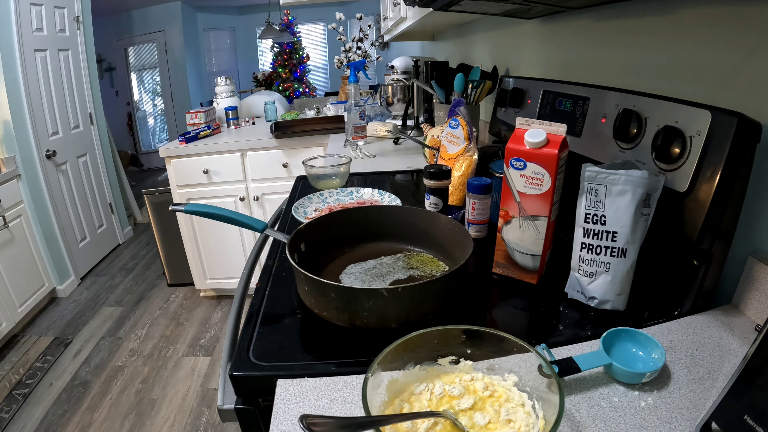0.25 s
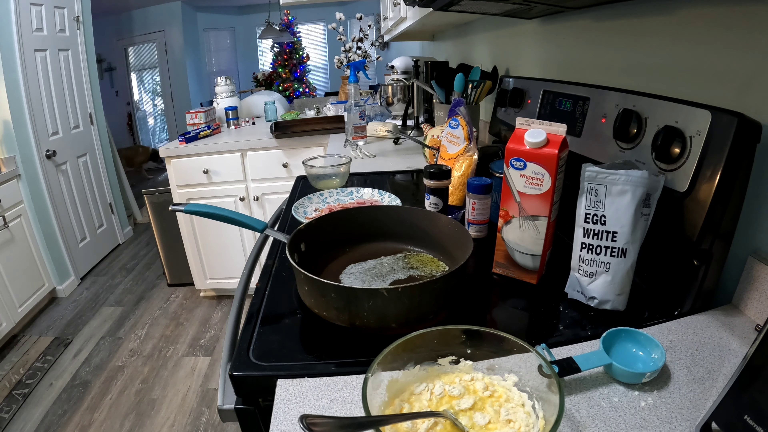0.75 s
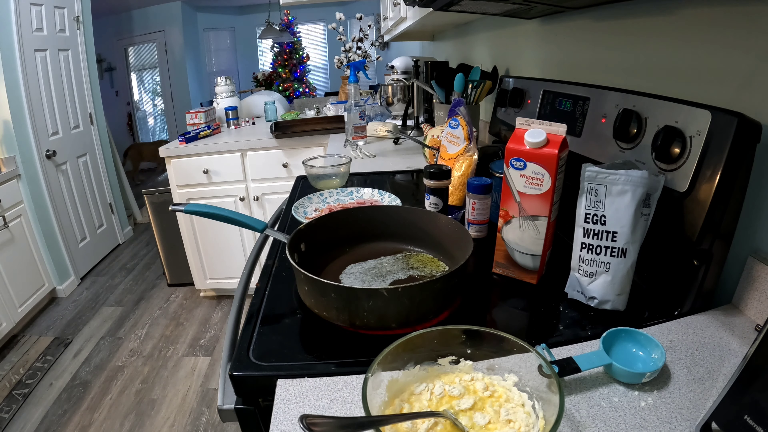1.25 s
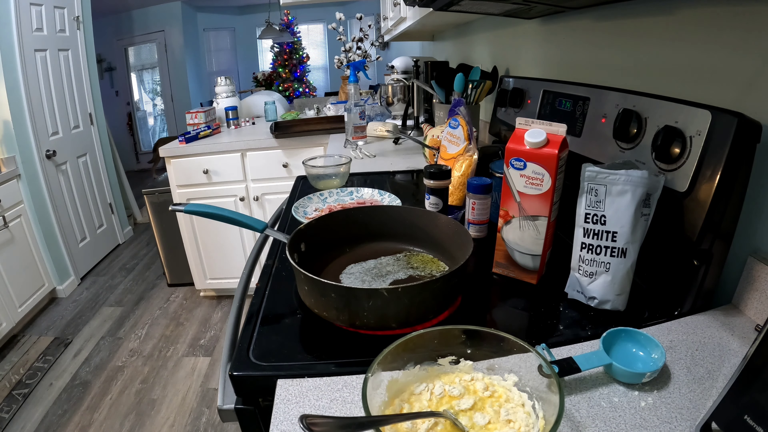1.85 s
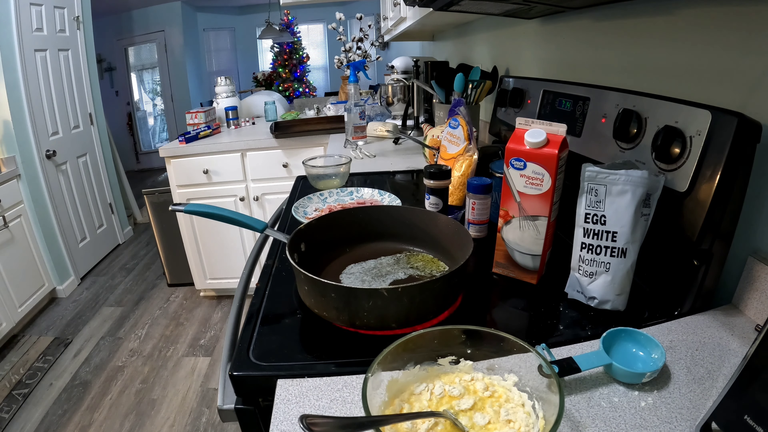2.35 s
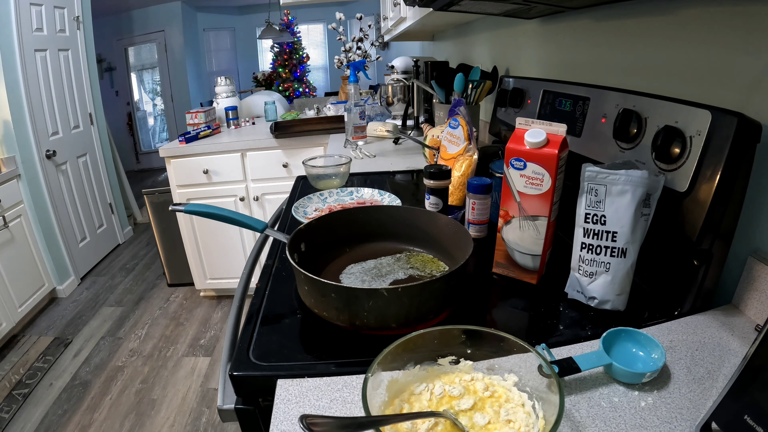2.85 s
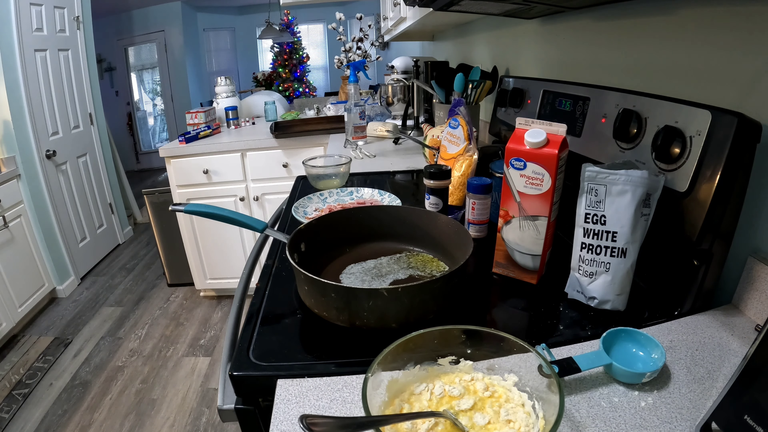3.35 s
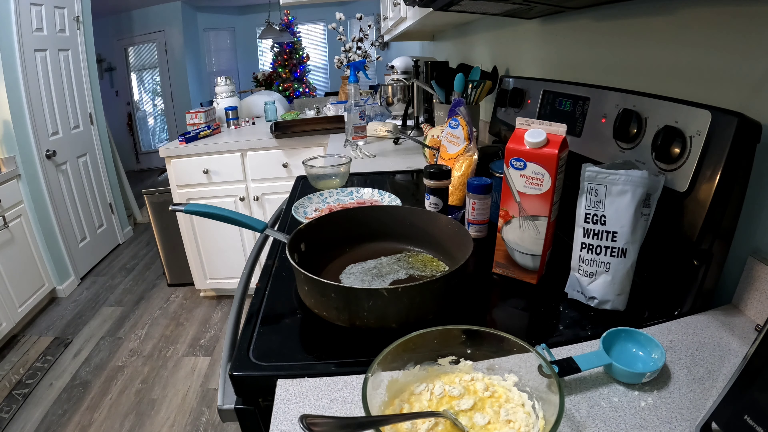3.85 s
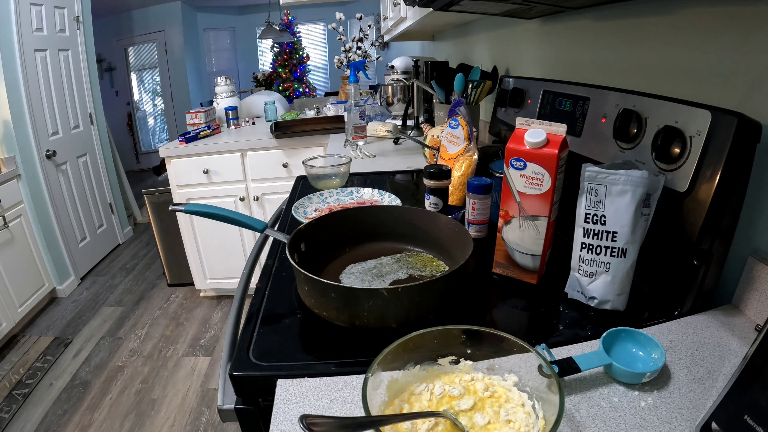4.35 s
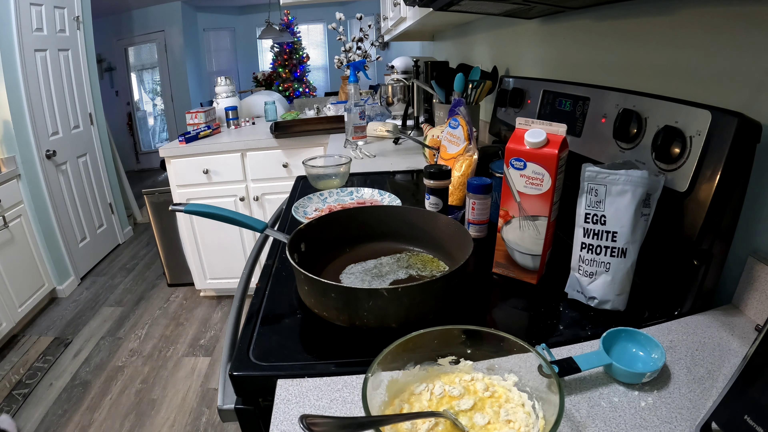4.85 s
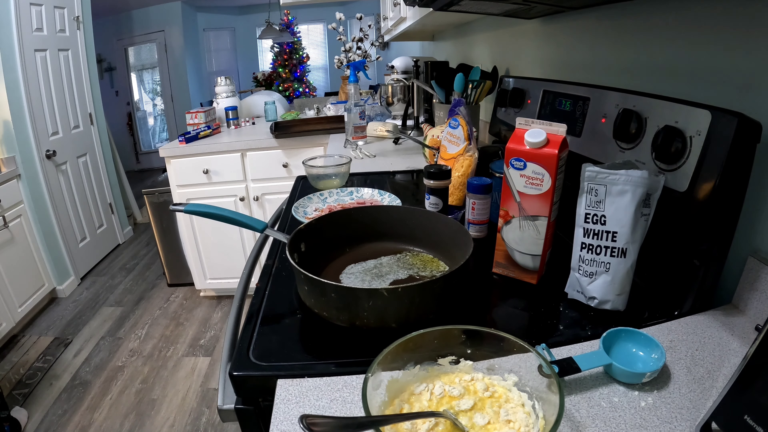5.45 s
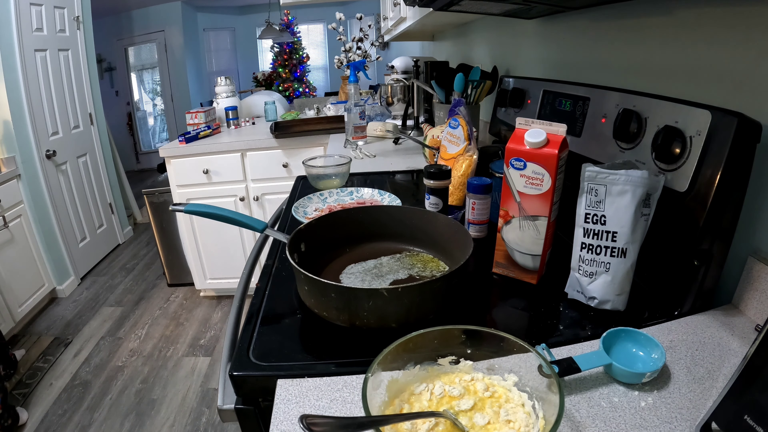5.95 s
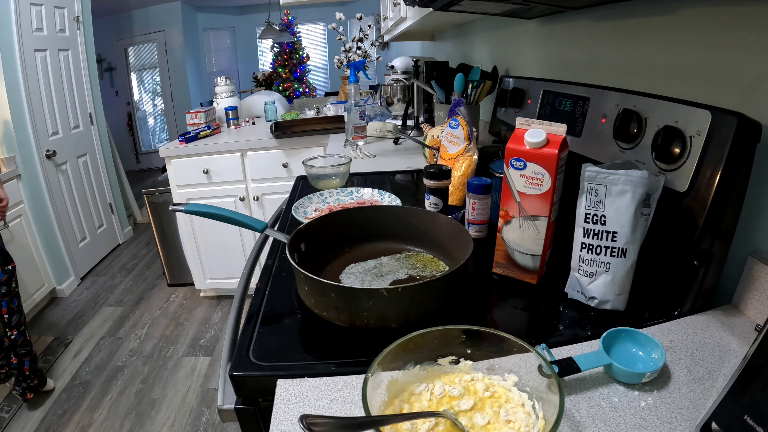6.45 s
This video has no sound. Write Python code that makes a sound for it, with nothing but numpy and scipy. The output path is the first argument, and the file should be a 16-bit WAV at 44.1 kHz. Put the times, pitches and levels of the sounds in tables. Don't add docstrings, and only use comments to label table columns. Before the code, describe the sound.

In a quiet kitchen, fat pops sharply and irregularly in a shallow pan close to a small stereo microphone. Off to one side a drawer rolls in fits, scraping and thumping its cabinet from about one and a half seconds. Midway it is shoved hard, the cutlery slams and clatters, then lesser knocks fade away, leaving pops, thin sizzle and a faint fridge hum.

```python
import sys
import numpy as np
from scipy import signal
from scipy.fft import rfft, irfft, next_fast_len
from scipy.io import wavfile
from scipy.ndimage import uniform_filter1d

SR = 44100
rng = np.random.default_rng(int(sys.argv[2]) if len(sys.argv) > 2 else 0)


def generate_wav(signal):
    frames = np.transpose(np.atleast_2d(signal))
    scaled = np.clip(frames, -1, 1) * 32767
    pcm = np.round(scaled).astype(np.int16)
    wavfile.write(sys.argv[1], SR, pcm)


def invert_db(x):
    u = np.asarray(x, float) / 20
    return 10 ** u


N = 295955
T = np.arange(N) / SR


def unit(x):
    return x / np.sqrt(np.mean(x ** 2))


def ring(x, hz, t60):
    pole = np.exp(2j * np.pi * hz / SR - np.log(1000) / (t60 * SR))
    return signal.lfilter([1], [1, -pole], x).imag


def peaks(x, table):
    total = 0
    for k, (hz, width, db) in enumerate(table):
        sign = (-1) ** k
        total = total + sign * invert_db(db) * signal.lfilter(*signal.iirpeak(hz, hz / width, SR), x)
    return total


def colour(x, table):
    hz, db = np.transpose(table)
    size = 8192
    grid_hz = np.arange(size // 2 + 1) * SR / size
    log_gain = np.interp(np.log(grid_hz + 1), np.log(hz), db) * np.log(10) / 20
    fold = irfft(log_gain) * np.r_[1, np.full(size // 2 - 1, 2), 1, np.zeros(size // 2 - 1)]
    return signal.fftconvolve(x, irfft(np.exp(rfft(fold))))[:N]


def jolts(rate, spread_db):
    size_db = spread_db * np.minimum(rng.exponential(size=N), 3.5)
    happens = rng.random(N) < rate / SR
    return unit(happens * np.clip(rng.standard_normal(N), -2.2, 2.2) * invert_db(size_db))


def walk(rate):
    k = int(SR / rate)
    steps = np.repeat(rng.standard_normal(N // k + 1), k)
    wander = uniform_filter1d(uniform_filter1d(steps, k), k)[:N]
    return np.clip(1.4 * wander, -1.8, 1.8)


def gain(table):
    s, db = np.transpose(table)
    return invert_db(np.interp(T, s, db, left=-140, right=-140))


def surge(s, db, hold, t60, rise):
    power, i = np.zeros(N), int(s * SR)
    t = T[:min(N - i, int((hold + t60) * SR))]
    fade = invert_db(db - 60 * np.maximum(t - hold, 0) / t60)
    power[i:i + len(t)] = (fade * (1 - np.exp(-t / rise))) ** 2
    return power


def place(x, pan_db):
    return np.array([x * invert_db(pan_db / 2), x * invert_db(-pan_db / 2)])


def pops():
    # pitch in Hz, width in Hz, level in dB.
    pan_floor = [(640, 3000, -12), (1240, 550, -2.5), (2130, 147, 1), (2800, 1240, -4.5)]
    # start in seconds, peak level in dB, bubble pitch in Hz,
    # low part in dB and bright part in dB, both relative to the bubble.
    bursts = [(0.165, -13.5, 6070, -16, 7), (0.2277, -21.5, 5800, -20, -13), (0.9557, -18, 6100, -29, -18),
              (1.1079, -16.5, 5530, -36, -17), (1.1499, -25, 6700, -32, -4), (1.661, -11, 5500, -2.5, 11),
              (1.727, -21.5, 5260, -1, -12), (1.9702, -17, 5760, -11, -13), (2.0428, -25, 5740, -21, -2),
              (2.4815, -27.5, 5160, 0, 11), (2.515, -22, 5550, -4.5, 11.5), (3.3895, -26, 3450, 5.5, -9),
              (3.5286, -25, 5760, -3.5, 0), (4.1041, -18.5, 6030, 4, 1), (4.1594, -23.5, 5800, -17, 5),
              (4.2819, -26.5, 4100, -0.5, -8), (4.3735, -22.5, 6050, -7, -14),
              (4.7171, -14, 5600, -10, -11), (4.8681, -18, 6060, -18, -4), (4.9116, -19, 5160, -17, -15),
              (5.1886, -20.5, 4570, -4, 3), (5.4954, -21, 6140, -30, 3), (5.7665, -23, 3540, -5, 2),
              (5.8119, -17.5, 6400, -14, 5), (6.0224, -20.5, 4330, -1.5, 8), (6.1304, -24.5, 6600, -26, 0),
              (6.492, -18, 4600, -20, -10), (6.526, -23.5, 5300, -13, -6), (6.6448, -20, 5070, -17, -13),
              (6.6696, -20.5, 5400, -2, -14)]
    # start in seconds, peak level in dB.
    large = [(0.2567, -34.5), (1.0193, -32.5), (1.7, -25), (2.416, -34), (3.188, -31.5), (3.2427, -51),
             (3.2549, -35), (4.1403, -27), (4.539, -24), (4.7392, -29), (5.2663, -27), (5.513, -36.5),
             (5.6316, -40), (6.2213, -37), (6.59, -38)]
    middle = [(0.1602, -34), (0.2881, -28.5), (0.873, -34), (0.9032, -33), (1.177, -31), (1.31, -35),
              (1.395, -27.5), (2.301, -29), (2.594, -28), (2.607, -26.5), (2.6534, -28), (2.724, -26),
              (2.7524, -46), (2.8424, -29.5), (2.942, -30), (3.0559, -29.5), (3.294, -32.5),
              (4.1946, -26.5), (4.2397, -31), (4.598, -29.5), (4.888, -28), (5.0727, -27.5), (5.118, -30.5),
              (5.169, -32), (5.353, -27.5), (5.729, -32.5), (5.792, -23.5), (5.9294, -38), (6.051, -30),
              (6.4172, -29.5), (6.5384, -29)]
    small = [(0.3103, -37), (0.494, -30), (0.7946, -32), (0.9301, -29.5), (1.2475, -38), (1.4676, -26.5),
             (1.91, -35), (2.785, -39), (2.811, -41), (2.894, -35), (4.355, -34), (5.666, -31),
             (5.688, -28.5), (5.778, -33), (5.9613, -39), (6.088, -35), (6.1994, -38), (6.319, -33),
             (6.393, -33), (6.407, -30), (6.459, -32)]
    tiny = [(0.019, -32), (0.03, -34), (0.238, -35), (0.567, -37), (0.705, -42), (0.2887, -30), (1.09, -35),
            (1.283, -34), (1.364, -31), (1.8552, -30), (2.5152, -29), (3.5289, -20.5), (3.6301, -23),
            (4.0931, -26), (4.701, -39.5), (5.1736, -25), (5.3512, -24.5), (5.89, -32.5), (5.9299, -22),
            (5.985, -42), (6.088, -33), (6.1305, -20.5), (6.1993, -29)]
    # bubble pitch in Hz, low part in dB relative to the bubble.
    sizes = [
        (3950, -1),
        (5650, -16),
        (6650, -8.5),
        (11000, -37),
    ]
    # start in seconds, peak level in
    # dB, pitch in Hz.
    ticks = [(0.4362, -50, 5440), (0.443, -46, 5560), (0.6911, -49, 5430), (0.7258, -53, 5380),
             (0.7496, -47, 5340), (0.8418, -41, 6030), (0.9085, -33, 5700), (0.934, -36, 7670),
             (1.09, -42, 5380), (1.3563, -34, 6890), (1.3624, -25.5, 7000), (1.7327, -26, 4200),
             (2.4826, -25, 5300), (2.7523, -36, 5200), (2.8151, -35, 6680), (2.825, -42, 5430),
             (2.8474, -35, 5900), (3.006, -38, 6040), (3.0383, -45, 5340), (3.0486, -41, 7110),
             (3.1361, -40, 5860), (3.2423, -32, 5450), (3.317, -42, 6980), (3.3894, -20, 5300),
             (4.2232, -34, 6680), (4.2615, -32.5, 5770), (4.2877, -31, 4010), (4.2981, -28.5, 6200),
             (4.3077, -34, 6100), (4.6097, -36, 6030), (4.6202, -39, 6120), (4.701, -33, 5350),
             (4.806, -37, 6850), (4.8584, -36, 4520), (4.9066, -27, 5740), (5.0575, -37, 6240),
             (5.0653, -36, 6930), (5.1806, -37, 6240), (5.2865, -37, 5560), (5.3458, -36, 6240),
             (5.393, -43, 6200), (5.4493, -49, 5040), (5.4634, -46, 6160), (5.4887, -24.5, 6200),
             (5.5548, -35, 5340), (5.5675, -40, 7670), (5.695, -27.5, 4430), (5.8902, -42, 6420),
             (5.93, -38, 5270), (5.9834, -40, 6720), (6.058, -30, 5400), (6.2208, -37, 5680),
             (6.333, -36, 5990), (6.422, -34, 5630), (6.5877, -37, 4500), (6.6875, -36, 5640)]
    pitch_scatter, low_scatter_db = 0.04, 4
    tick_low_db, faint_bright_db = -16, -4
    wall_echo_s, wall_echo = 0.000394, 0.15

    bubbles = list(bursts)
    for rows, (size_hz, size_low_db) in zip([large, middle, small, tiny], sizes):
        for s, db in rows:
            hz = size_hz * (1 + pitch_scatter * rng.standard_normal())
            low_db = size_low_db + low_scatter_db * rng.standard_normal()
            bubbles.append((s, db, hz, low_db, faint_bright_db))
    for s, db, hz in ticks:
        bubbles.append((s, db, hz, tick_low_db, faint_bright_db))

    length = 1024
    out, t = np.zeros(N + length), T[:length]
    for s, db, hz, low_db, bright_db in bubbles:
        crack_noise, push_noise, scatter_noise = rng.standard_normal((3, length))
        crack_bands = [(hz, 2000, 2), (7800, 1500, bright_db + 2), (11700, 3000, bright_db + 9)]
        crack = peaks(crack_noise * np.exp(-t / 0.00042), crack_bands)
        tone = np.sin(2 * np.pi * hz * t) * np.exp(-t / 0.0005)
        bubble = (tone + 0.46 * crack) * (1 - np.exp(-t / 0.00033))
        push = (np.sign(push_noise[0]) + 0.2 * push_noise) * np.exp(-t / 0.00008)
        burst = bubble + invert_db(low_db + 12.5) * peaks(push, pan_floor)
        echo = wall_echo * np.interp(t - wall_echo_s, t, burst, left=0)
        rim = invert_db(-7.0) * peaks(scatter_noise * np.exp(-t / 0.0032), [(hz, 3200, 0)])
        i = int((s + 0.0006) * SR)
        out[i:i + length] += (burst + echo + rim) * invert_db(db)
    return place(out[:N], pan_db=-1.4)


def sizzle():
    # time in seconds, level in dB.
    heat = [(0, -67), (.5, -75), (1.3, -69), (5.3, -61), (5.899, -53.5), (6.3, -59), (6.71, -52.5)]
    # time in seconds, level in dB.
    spray = [(0, -94), (1.0, -73), (2.2, -69.5), (3.0, -78.5), (3.7, -66.5), (4.3, -79), (5.4, -75),
             (5.95, -70), (6.4, -68), (6.71, -75)]
    grains = 0
    for hz, width, db in [(4600, 2400, 1), (6300, 1700, -1.0), (9500, 3200, -8.0)]:
        grains = grains + invert_db(db) * peaks(jolts(110, spread_db=1), [(hz, width, 0)])
    fizz = unit(grains) * gain(heat) * invert_db(3.1 * walk(15) - 6.5)
    mist_band = [(11600, 4900, 0)]
    mist = unit(peaks(peaks(jolts(2500, spread_db=1.5), mist_band), mist_band))
    mist = mist * invert_db(1.9 * walk(7.2) + 12) * gain(spray)
    return place(fizz + mist, pan_db=0.3)


def drawer():
    # pitch in Hz, width in Hz, level in dB.
    boom_modes = [(40, 22, -5.5), (81.2, 11.7, 0), (92, 17, -10.5), (108, 25, -4.5), (151.6, 11.5, -10.5)]
    # pitch in Hz, width in Hz, level in dB.
    panel_modes = [(194.6, 25, 1.5), (246, 14.3, 2), (288, 27, 1.5), (349, 57, -1.5), (423.6, 11, -0.5),
                   (550, 200, -12.5)]
    # frequency in Hz, level in dB per Hz.
    runner_tone = [(290, -31), (500, -0.5), (681, 4.5), (770, -7), (921, 4), (1110, 1), (1510, 2.5),
                   (2130, 2.5), (2790, -7), (3300, -26), (4300, -9.5), (7700, -38.5)]
    # frequency in Hz, level in dB per Hz.
    contents_tone = [(1500, -0.5), (2600, -7), (3500, 3), (4600, 1.5), (5600, -4), (6400, -2), (7500, -8.5),
                     (8600, -8.5), (12000, -10.5), (15500, -35)]
    # time in seconds, level in dB.
    drone_level = [(3.04, -55), (3.1, -38.5), (3.3, -42.5), (3.45, -39.5), (3.55, -63)]
    # start in seconds, runners peak in dB, sliding contents in dB,
    # length of the slide in seconds, loudest chatter in Hz.
    lurches = [(0.0, -39.5, -46.5, 0.006, 2000), (0.492, -44.5, -47.5, 0.011, 1300),
               (0.909, -47.5, -49, 0.016, 1490), (1.347, -37.5, -41, 0.062, 2170),
               (1.442, -36.5, -40.5, 0.053, 2420), (1.505, -36.5, -45, 0.052, 1540),
               (1.761, -28, -35.5, 0.029, 1040), (2.006, -27.5, -35.5, 0.034, 870),
               (2.139, -29, -32.5, 0.037, 1240), (2.266, -36.5, -40.5, 0.022, 890),
               (2.459, -32, -35.5, 0.01, 2270), (3.111, -36.5, -45, 0.036, 990),
               (3.29, -41.5, -52, 0.11, 980), (3.374, -23.5, -30, 0.01, 2160),
               (3.565, -30, -28.5, 0.062, 2250), (3.627, -27.5, -21.5, 0.032, 2260),
               (3.684, -25, -23.5, 0.029, 2320), (3.812, -21, -30.5, 0.015, 880),
               (3.925, -24, -29.5, 0.056, 2460), (4.029, -44, -48, 0.13, 1360),
               (4.373, -27, -37.5, 0.07, 2130), (4.439, -44, -41, 0.016, 1400),
               (4.755, -35.5, -56, 0.035, 1390), (5.15, -38.5, -47, 0.032, 1810),
               (5.177, -31.5, -44.5, 0.02, 1230), (5.763, -41, -42.5, 0.04, 2090),
               (6.25, -48, -57.5, 0.1, 570)]
    # start in seconds, peak level in dB, boom pitch in Hz,
    # panels in dB relative to the boom, time to fade by 60 dB in seconds.
    thumps = [(1.353, -28.5, 90.6, -50, 0.36), (1.512, -16, 86, -20.5, 0.24),
              (1.777, -14.5, 70.6, -16, 0.17), (2.006, -31, 105.3, -6.5, 0.89),
              (2.145, -13.5, 98, -13.5, 0.19), (2.191, -16, 99, -15, 0.2),
              (2.255, -30.5, 117.3, -5.5, 0.92), (2.471, -20.5, 87.7, -16, 0.68),
              (2.767, -21, 108, -44, 0.094), (3.116, -22.5, 92, -18.5, 0.23),
              (3.385, -21.5, 68, -11.5, 0.12), (3.673, -14.5, 80, -17, 0.19),
              (3.795, -13.5, 88.4, -12.5, 0.27), (3.839, -25, 103, -12, 0.093),
              (3.926, -14.5, 84.3, -16, 0.18), (3.975, -10, 78.3, -49, 0.15), (4.391, -32, 86, 3, 0.16),
              (4.439, -26, 81.2, -5.5, 0.68), (4.569, -20.5, 74, -14, 0.17), (4.762, -18.5, 92, -18, 0.12),
              (4.837, -20.5, 72, -49, 0.25), (5.038, -30, 85.6, -30, 0.42), (5.171, -22, 81.6, -18, 0.12),
              (5.198, -24.5, 92, -4.5, 0.23)]
    # time in seconds, level in dB.
    load = [(0, -37.5), (.11, -54.5), (1.28, -57), (1.382, -39.5), (2.27, -35), (2.57, -40), (2.86, -46.5),
            (3.95, -29), (4.19, -39), (4.48, -31.5), (4.74, -50.5), (4.84, -37), (5.01, -47), (5.18, -34),
            (5.45, -62)]
    drone_hz, drone_sag_hz_per_s = 149, 26.2
    panels_db = -9.5
    slip_t60_s, slip_rise_s = 0.47, 0.008
    slide_t60_s, slide_rise_s = 0.5, 0.0023

    roll = jolts(500, spread_db=0.5) + 1.15 * rng.standard_normal(N)
    slide = jolts(1500, spread_db=-1.5) + 0.5 * rng.standard_normal(N)
    boom = unit(peaks(peaks(roll, boom_modes), [(84.4, 310, 0)]))
    panels = unit(peaks(roll, panel_modes))
    runners = unit(colour(roll + 0.35 * jolts(400, spread_db=2), runner_tone))
    contents = unit(colour(slide, contents_tone))

    t = T - drone_level[0][0]
    drone_phase = 2 * np.pi * (drone_hz - drone_sag_hz_per_s * t / 2) * t
    low = unit(np.sin(drone_phase + 0.5 * walk(35))) * gain(drone_level)
    low = low + (boom + invert_db(panels_db) * panels) * gain(load)

    knock = 0
    for s, db, hz, panel_db, t60 in thumps:
        thump = np.sqrt(surge(s, db - 0.5, 0, t60, rise=0.0093))
        low = low + thump * np.sin(2 * np.pi * hz * (T - s))
        knock = knock + surge(s, db + panel_db - 8.0, 0.029, 0.55 * t60, rise=0.001)
    low = low + panels * np.sqrt(knock)

    rail, slide_power = 0, 0
    for s, db, slide_db, hold, hz in lurches:
        favoured = peaks(runners, [(hz, 200, 0), (hz * 0.713, 120, -1), (hz * 1.37, 200, -3)])
        slip = np.sqrt(surge(s, db - 15.5, hold, slip_t60_s, slip_rise_s))
        rail = rail + (runners + 0.62 * favoured) * slip
        slide_power = slide_power + surge(s, slide_db - 11.5, hold, slide_t60_s, slide_rise_s)
    rail = rail * invert_db(1.35 * walk(40))
    sliding = contents * np.sqrt(slide_power) * invert_db(1.16 * walk(35))
    high = place(rail, pan_db=6.0) + place(sliding, pan_db=2.5)
    return place(low, pan_db=0.3), high


def cutlery():
    # start in seconds, strength in dB.
    shaking = [
        (3.59, -39.5),
        (3.687, -25.5),
        (3.78, -41),
        (3.83, -30.5),
        (3.928, -36),
        (4.1, -64),
    ]
    # pitch in Hz, level in dB, time to fade by 60 dB in seconds.
    heap_modes = [(933, -12, 0.071), (1010, -19, 0.16), (1570, -9, 0.05), (1646, -10, 0.12),
                  (2180, -9, 0.054), (2256, -3, 0.05), (2440, -2, 0.03), (3200, -8.5, 0.042),
                  (3400, -8, 0.048), (3450, -3, 0.016), (3500, -12, 0.06), (4100, -9, 0.034),
                  (4530, -10, 0.032), (5070, -19, 0.063)]
    # start in seconds, strength in dB.
    slams = [
        (3.688, -17.5),
        (3.7007, -22),
        (3.713, -37),
        (3.737, -43),
    ]
    # start in seconds, level in dB,
    # pitch in Hz, time to fade by 60 dB in seconds.
    clinks = [(0, -54, 6580, 0.16), (1.369, -41, 1560, 0.061), (2.05, -44, 1535, 0.12),
              (3.645, -22, 3450, 0.032), (3.737, -22.5, 3200, 0.072), (3.84, -36.5, 3280, 0.2),
              (3.876, -31.5, 3380, 0.11), (3.937, -28, 2350, 0.059), (3.991, -45, 1897, 0.15),
              (4.013, -32, 1815, 0.2), (4.03, -30, 1535, 0.1), (4.045, -30, 1540, 0.099),
              (3.706, -26.5, 917, 0.13), (4.108, -30.5, 1540, 0.14), (4.498, -39, 1540, 0.15),
              (4.757, -37, 1490, 0.055), (1.443, -39, 2020, 0.038), (1.8, -43, 970, 0.11),
              (2.05, -37, 958, .1), (1.77, -34, 515, 0.067), (2.018, -37, 710, 0.062),
              (2.143, -39, 1220, 0.049), (3.567, -34, 4100, 0.076), (3.567, -39, 3290, .08),
              (3.608, -40, 6200, .05), (3.632, -25, 2215, 0.036), (3.644, -35, 6160, .05),
              (3.688, -25, 4590, 0.036), (3.7, -23, 2220, .018), (3.689, -19.5, 2203, .2),
              (3.733, -28, 1582, 0.096), (3.689, -21.5, 2273, .2), (3.965, -33, 4250, 0.058),
              (3.813, -26.5, 2140, .05), (3.84, -28, 2200, 0.044), (3.952, -29, 2270, 0.089),
              (3.996, -31, 4020, 0.044), (4.06, -30.5, 855, 0.09), (4.378, -39, 2230, 0.068),
              (4.407, -35, 2073, 0.098), (4.463, -32, 1460, 0.052), (4.761, -41, 1200, 0.056),
              (4.825, -41, 1380, 0.042), (5.178, -32.5, 1117, 0.063), (5.18, -38, 1400, 0.071),
              (5.203, -40, 1970, 0.04), (5.212, -36, 353, 0.06), (6.492, -35, 2090, 0.028),
              (3.392, -35, 290, 0.081), (5.193, -30, 303, 0.036)]
    shake_t60_s, blow_s = 0.35, 0.001
    heap_damping = 0.6
    rattle, rise_share = 0.51, 0.018

    shake = np.sqrt(sum(surge(s, db, 0, shake_t60_s, rise=0.0026) for s, db in shaking))
    shake = shake * (rng.random(N) < 260 / SR)
    blows = np.sqrt(sum(surge(s, db - 19.5, blow_s, 0.014, rise=blow_s) for s, db in slams))
    sound = np.zeros(N)
    for hz, db, t60 in heap_modes:
        strike = 1.23 * shake * rng.uniform(-2.06, 1.9, N) + blows * rng.standard_normal(N)
        sound += invert_db(db) * ring(strike, hz, heap_damping * t60)

    wobble, flutter = walk(70), walk(90)
    for s, db, hz, t60 in clinks:
        i = int(s * SR)
        t = T[:min(SR // 2, N - i)]
        now = slice(i, i + len(t))
        swing = np.sin(2 * np.pi * hz * t + rattle * wobble[now]) * (1 + rattle * flutter[now] / 2)
        sound[now] += invert_db(db - 60 * t / t60) * (1 - np.exp(-t / (rise_share * t60))) * swing
    return place(sound, pan_db=3.0)


def room(x):
    # frequency in Hz, time to fade by 60 dB in seconds, level in dB.
    echo_bands = [(292, 0.75, 9.5), (1490, 0.48, 4.5), (3970, 0.29, 3.5), (12200, 0.23, 1.5)]
    alike = 0.49
    t = T[:SR // 2]
    tail = 0
    for hz, t60, db in echo_bands:
        edges_hz = [hz / 1.88, min(hz * 1.63, 20000)]
        band = signal.butter(2, edges_hz, "band", fs=SR, output="sos")
        noise = signal.sosfilt(band, rng.standard_normal((2, len(t))))
        tail = tail + invert_db(db - 60 * t / t60) * noise
    tail = tail * np.clip((t - 0.002) / 0.0019, 0, 1) / np.sqrt(np.sum(tail[0] ** 2))
    shared = np.sqrt(1 + alike) * tail[0]
    differing = np.sqrt(1 - alike) * peaks(tail[1], [(2460, 6700, 2.0)])
    pair = shared + differing * np.array([[1], [-1]])
    return signal.fftconvolve(pair, x.mean(axis=0)[None], axes=1)[:, :N]


def air():
    # frequency in Hz, level in dB per Hz.
    noise_tone = [(12, -44), (20, 2.5), (137, -1), (208, -8.5), (353, -10.5), (441, -20), (652, -18),
                  (861, -38), (1460, -16), (1930, -23.5), (3100, -32.5), (6960, -35.5), (8460, -36.5),
                  (12200, -34), (13200, -46), (15600, -60)]
    # middle in seconds, rise in dB, half length in seconds.
    hum_swells = [
        (0, 17.5, 0.14),
        (0.788, 15.5, 0.36),
        (5.894, 14, 0.245),
        (6.71, 18.5, 0.13),
    ]
    noise_db, hum_hz, hum_db = -49, 120.7, -63
    creep_db_per_s = 0.71
    mid, side = (unit(colour(rng.standard_normal(N), noise_tone)) for _ in range(2))
    swell = walk(3.15)
    rumble = signal.sosfilt(signal.butter(2, 800, fs=SR, output="sos"), mid)
    hiss = mid - rumble
    mid = rumble * invert_db(creep_db_per_s * T - 2.5)
    for hz in 1000 * 2.25 ** np.arange(4):
        band = signal.butter(1, [hz / 1.33, hz * 1.366], "band", fs=SR, output="sos")
        mid = mid + signal.sosfilt(band, hiss) * invert_db(2.38 * walk(6.5) + 3.0 * swell)
    side = invert_db(-6.5) * peaks(side, [(2350, 17400, 0)])
    hum_level = hum_db + sum(db * np.exp(-((T - s) / half) ** 4) for s, db, half in hum_swells)
    hum = np.sin(2 * np.pi * hum_hz * T + 0.68 * walk(1.9)) * invert_db(hum_level)
    return invert_db(noise_db) * (mid + side * np.array([[1], [-1]])) + hum


def scene():
    fat = pops() + sizzle()
    low, high = drawer()
    heap = cutlery()
    to_room = invert_db(-11.5) * heap + invert_db(-10.0) * fat + invert_db(-22.5) * low + invert_db(-8.5) * high
    return fat + low + high + heap + room(to_room) + air()


def roll_off(x):
    return signal.sosfilt(signal.butter(12, 15400, fs=SR, output="sos"), x)


def record(dry):
    # frequency in Hz, level in dB.
    mic_tone = [(20, -3.5), (7600, -0.5), (8800, -10.5), (10800, -18.5), (12000, -22.5), (14000, -26.5),
                (16000, -45)]
    # frequency in Hz, level in dB.
    difference_tone = [(60, -1), (1000, -3.5), (5200, 4), (6200, -8.5), (12000, 11.5)]
    # frequency in Hz, phase turn in radians.
    phase_turn = [(400, -0.14), (1120, -0.65), (2600, -1.08), (3100, -0.44), (4300, -1.1), (5250, -0.23),
                  (15000, 0)]
    mid = colour(dry.mean(axis=0), mic_tone)
    side = colour(colour((dry[0] - dry[1]) / 2, mic_tone), difference_tone)
    hz, turn = np.transpose(phase_turn)
    size = next_fast_len(N)
    grid_hz = np.arange(size // 2 + 1) * SR / size
    half = np.exp(0.5j * np.interp(grid_hz, np.r_[0, hz], np.r_[0, turn]))
    spectra = rfft(np.array([mid + side, mid - side]), size)
    ports = irfft(spectra * np.array([half, half.conj()]), size)[:, :N]
    return roll_off(ports)


dry = scene()
out = record(dry)
generate_wav(out)
```